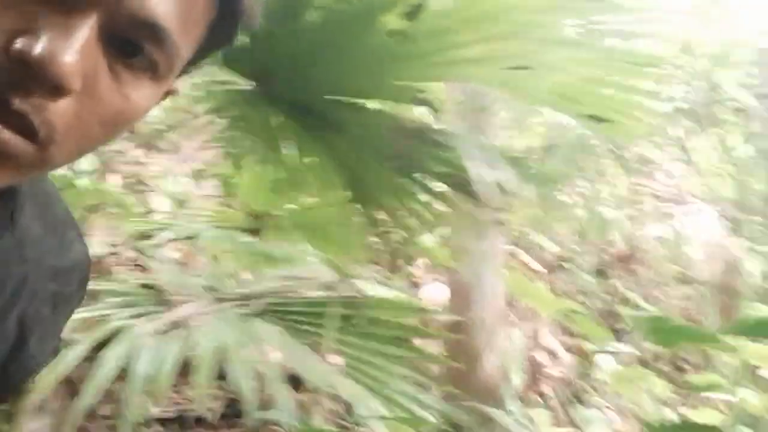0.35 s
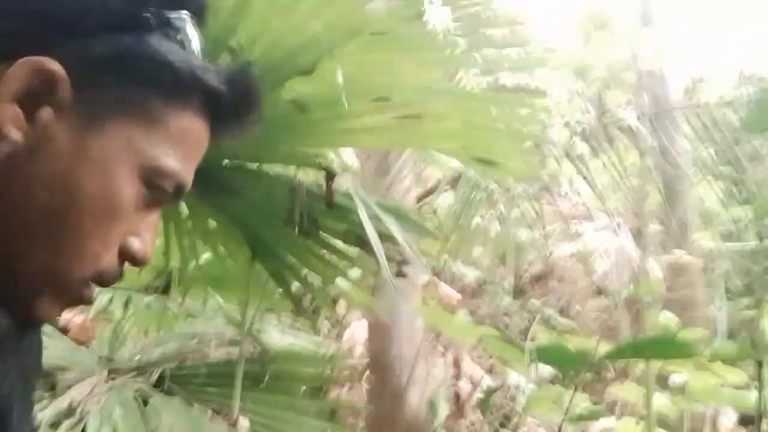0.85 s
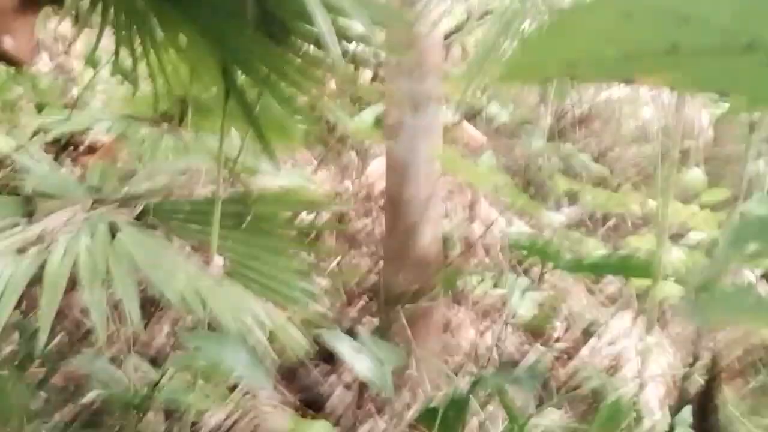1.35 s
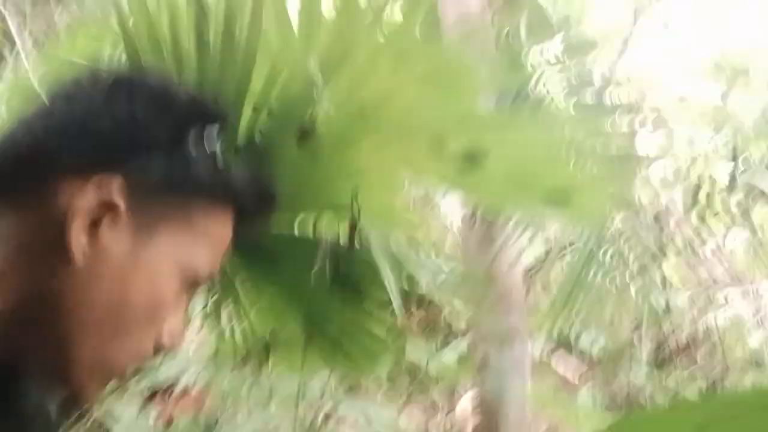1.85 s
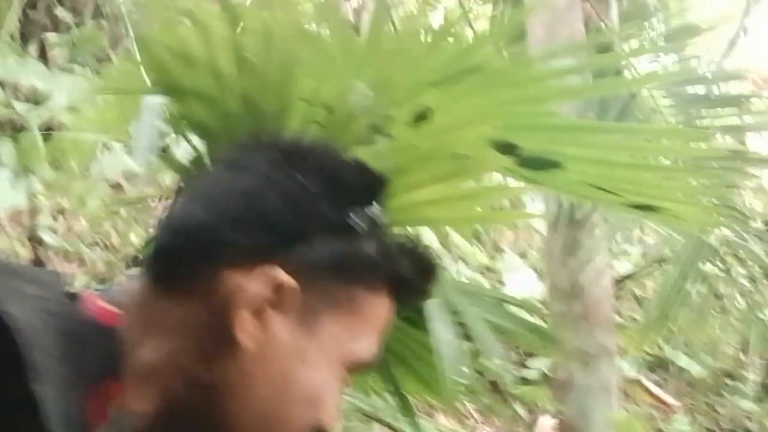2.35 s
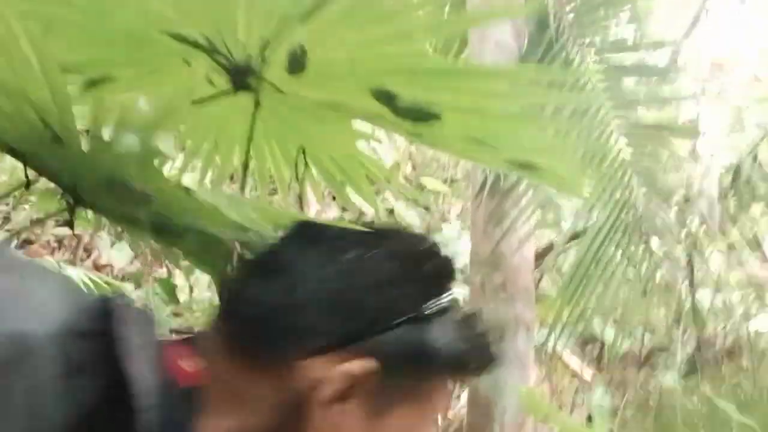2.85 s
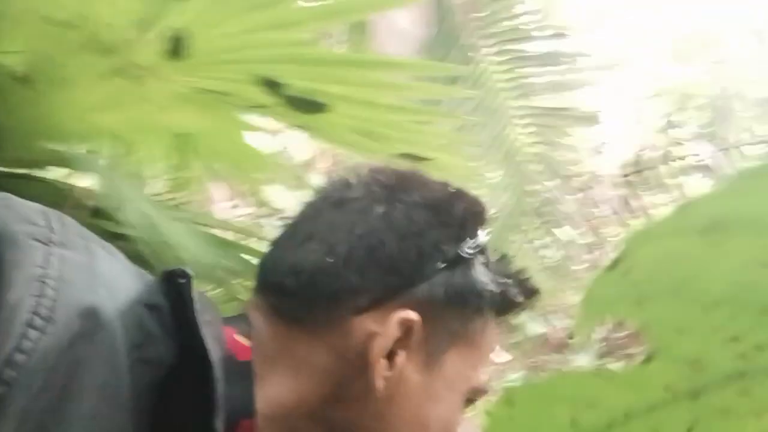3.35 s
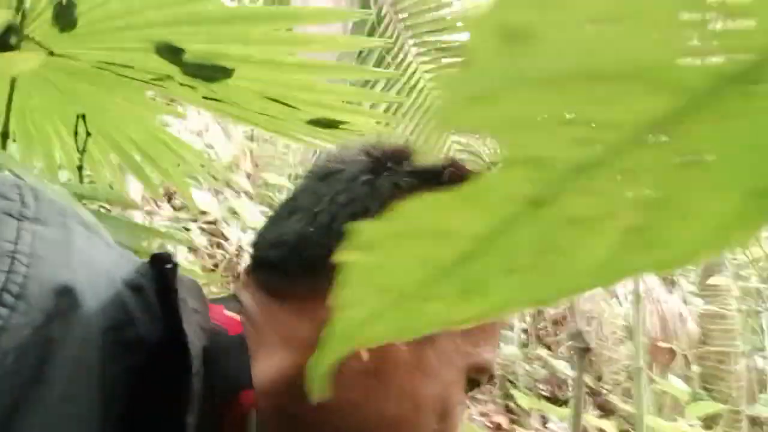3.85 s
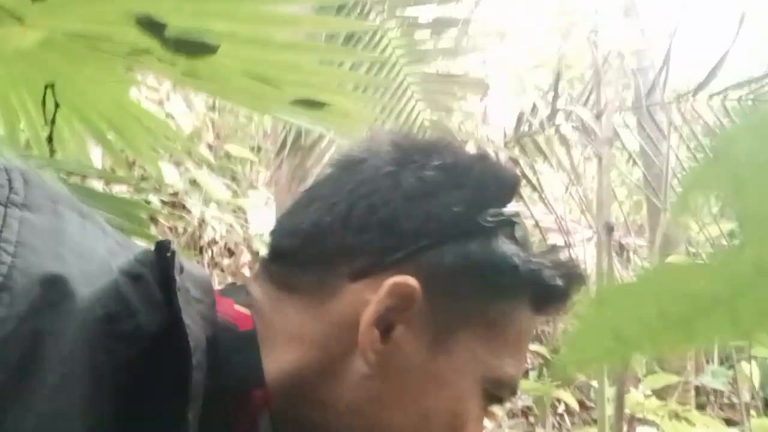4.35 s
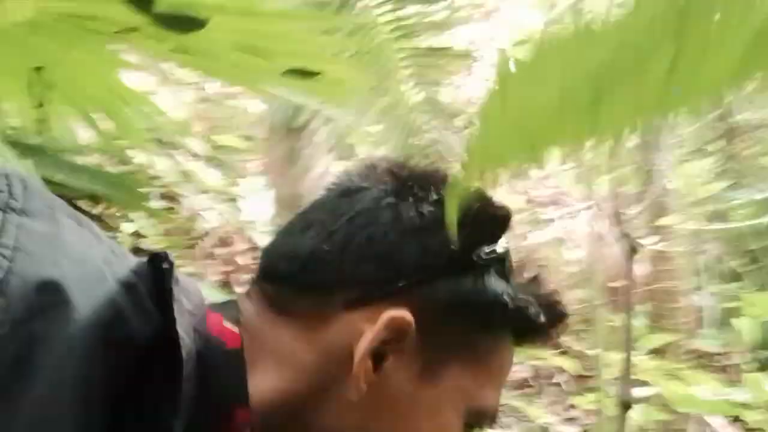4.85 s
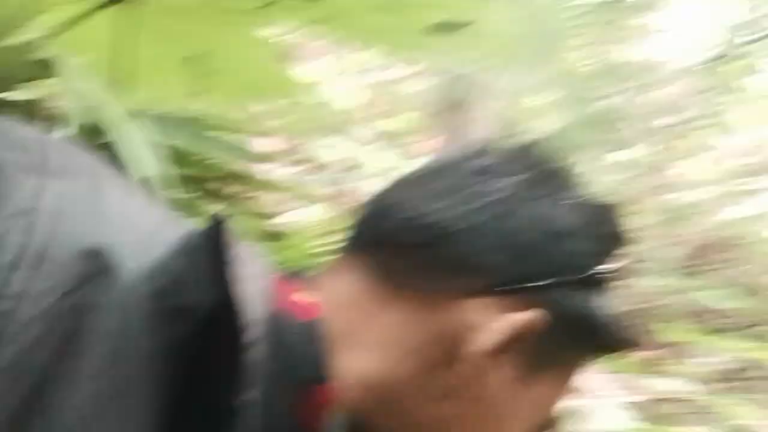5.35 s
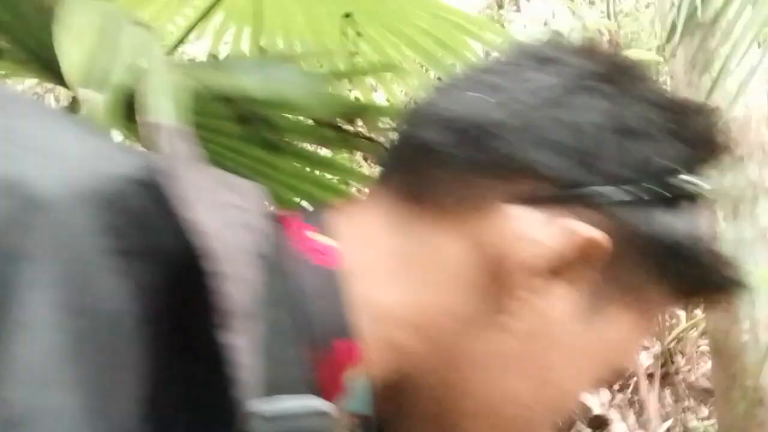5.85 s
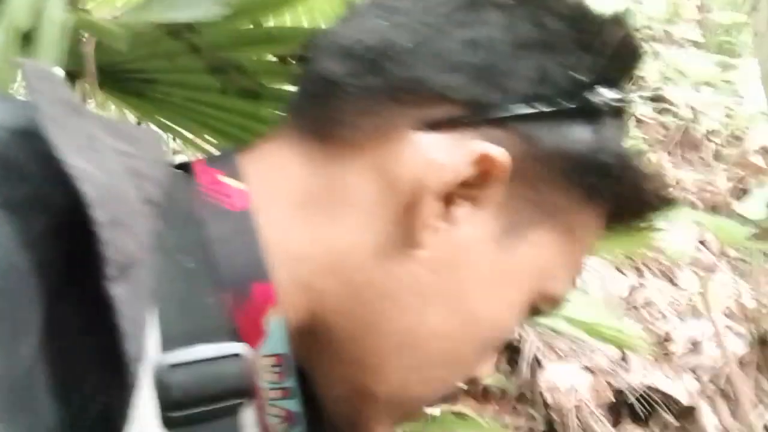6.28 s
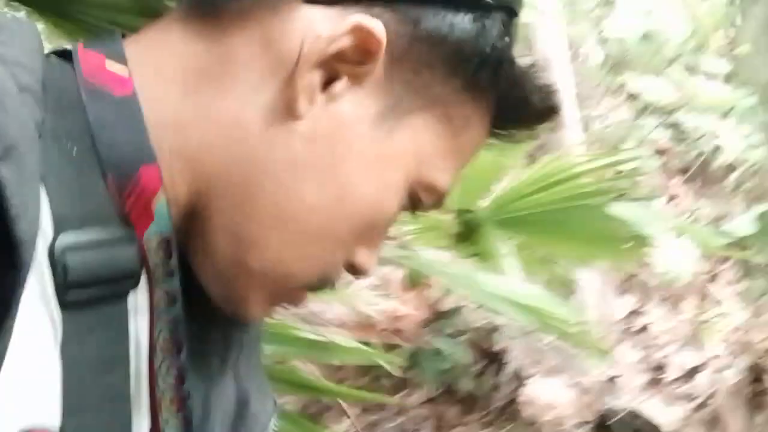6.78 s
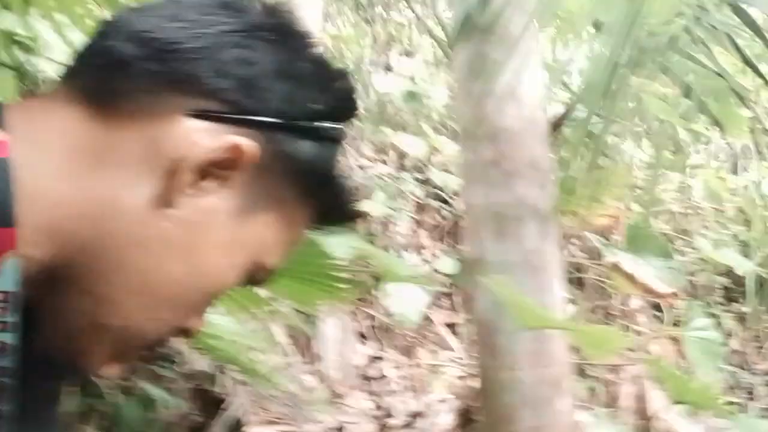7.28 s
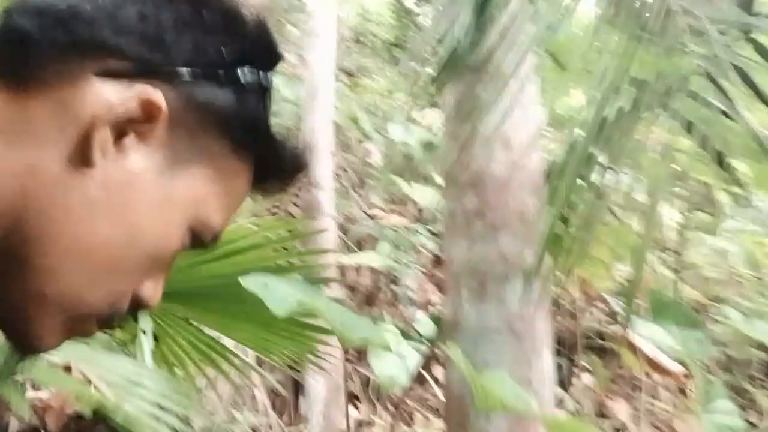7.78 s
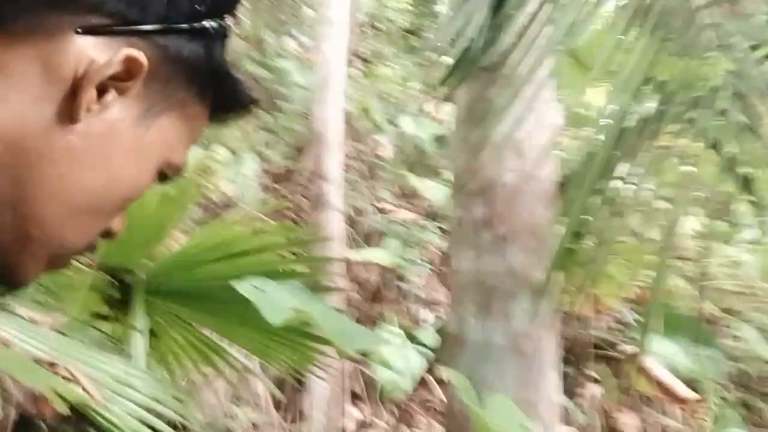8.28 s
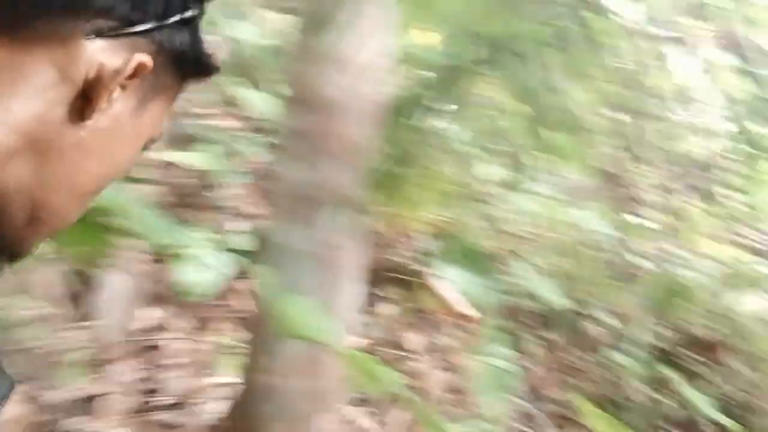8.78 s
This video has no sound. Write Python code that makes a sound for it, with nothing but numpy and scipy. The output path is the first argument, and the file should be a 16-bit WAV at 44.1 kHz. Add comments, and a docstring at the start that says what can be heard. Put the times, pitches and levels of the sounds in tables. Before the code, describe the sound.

Close to a handheld phone, someone pushes through dry forest undergrowth. Leaves tick and fronds scrape lightly, snaps grow more frequent, then a loud crunching burst breaks out before four seconds. It drops nearly quiet, with a faint falling bird whistle, before a second longer crashing rustle with hard snaps. It fades into light ticks and a small metallic clink over thin insects.

```python
"""Pushing through dry undergrowth

Someone walks through dry forest growth with a phone in hand: fronds and dead leaves rustle (patchy, coloured noise
broken up by tiny fractures), stems snap and knock (short noise bursts), and air rushes low past the swinging phone.
A steel blade clinks (decaying modes), a far bird whistles once (a gliding sine), insects sing thinly (narrow noise).
The small microphone port rings near 3.6 kHz and a noise suppressor ducks every band that is weak."""
import sys
import numpy as np
from scipy import signal
from scipy.fft import rfft, irfft
from scipy.io import wavfile
from scipy.ndimage import uniform_filter1d, map_coordinates

SR = 44100
rng = np.random.default_rng(int(sys.argv[2]) if len(sys.argv) > 2 else 0)


def transcribe(u):
    """Save the signal u as a 16-bit wav file named by the first command-line argument.

    u: samples, shape (n,) or (channels, n), limited to [-1, 1]; the rate is SR.
    q: integer samples, one column per channel.
    """
    v = np.clip(np.atleast_2d(u).T, -1, 1)
    q = np.round(v * 32767).astype(np.int16)
    wavfile.write(sys.argv[1], SR, q)


def voltage_ratio(level):
    """Linear amplitude factor for a level in decibels (scalar or array-like)."""
    return 10 ** (np.asarray(level, float) / 20)


N = 392931

# Colours of leaf and stem sounds as they pass the microphone port: ticking at the port's ring, mid scraping,
# the low body of stems, and the topmost fizz. Each row: frequency in Hz, relative level in dB per Hz.
CRACKLE_COLOUR = [(1800, -41.5), (2600, -15), (3000, -6.5), (3300, -1), (3600, 3), (3950, -1.5),
                  (4300, -11), (4900, -16.5), (5500, -18.5), (7000, -60.5)]
SCRAPE_COLOUR = [(600, -45), (900, -5), (1500, -3), (2200, 1), (2700, 0), (3600, -46)]
BODY_COLOUR = [(25, -52), (70, -63), (110, -31), (165, -51), (220, -15), (310, -5), (550, 0), (900, -3),
               (1400, -22.5)]
FIZZ_COLOUR = [(4200, -38), (5700, -2.5), (7500, -2.5), (10500, -5), (11800, -9), (13800, 2), (15200, 2.5),
               (16000, -19.5)]
# Single fronds sweeping past the microphone. Each row: time of the peak in seconds, effort in dB, length in seconds,
# extra effort in dB for fizz and sheen, extra effort in dB for scrape.
FROND_SWEEPS = [(0.846, -43.5, 0.15, -1, -3), (1.19, -44.5, 0.27, 0, 0.5), (1.447, -41, 0.13, -4, 1.5),
                (1.612, -39, 0.095, 0.5, 0.5), (1.722, -42, 0.06, 2.5, 1), (1.824, -38, 0.16, -3, -1.5),
                (2.035, -41, 0.19, -5, 0.5), (2.197, -48, 0.13, -7, 6), (2.327, -39, 0.24, -0.5, -3),
                (2.688, -40.5, 0.2, 2, -1), (2.88, -42.5, 0.14, 0, -7), (3.135, -41.5, 0.4, 3, 1.5),
                (3.427, -39, 0.11, 5, 1), (3.692, -23.5, 0.074, -2.5, -2), (3.803, -28, 0.11, 7, -4),
                (3.953, -41.5, 0.048, 6, 1.5), (4.253, -51.5, 0.14, -7, -8), (4.97, -51.5, 0.13, 2.5, 3),
                (5.536, -52, 0.045, 13, 7), (5.742, -50.5, 0.048, 15, -9), (6.138, -32.5, 0.18, -7, -4),
                (6.57, -34.5, 0.032, -10, 3), (6.778, -30.5, 0.15, 3.5, -0.5),
                (6.928, -32.5, 0.096, 8.5, -6), (7.057, -35, 0.38, 6, 0.5), (7.176, -36.5, .15, 0, -14),
                (7.36, -51.5, 0.24, 4, -1.5), (8.133, -45.5, 0.072, -1, 3), (8.285, -47, 0.06, 3, 0),
                (8.473, -46.5, 0.072, 0, -2), (8.557, -47, 0.17, 8, -3), (8.711, -48, 0.13, 5.5, 1),
                (8.806, -44.5, 0.11, 4, -9)]


def unit(x):
    """Scale to rms 1."""
    return x / np.sqrt(np.mean(x ** 2) + 1e-20)


def along(points, hz):
    """Read (Hz, value) points at hz, on a log frequency axis."""
    point_hz, values = np.transpose(points)
    return np.interp(np.log(hz + 1), np.log(point_hz + 1), values)


def curves(rows):
    """One value per sample for each column after the time."""
    seconds, *columns = np.transpose(rows)
    return [np.interp(np.arange(N) / SR, seconds, column) for column in columns]


def wobble(rate):
    """A smooth random curve with rate knots a second."""
    return map_coordinates(rng.standard_normal(N // 100), [np.arange(N) * rate / SR])


def response(spectrum, size=4096):
    """Causal (minimum-phase) impulse response with the given colour, by folding its cepstrum."""
    gain = voltage_ratio(along(spectrum, np.fft.rfftfreq(size, 1 / SR)))
    cepstrum = irfft(np.log(gain + 1e-5))
    cepstrum[1:size // 2] *= 2
    cepstrum[size // 2 + 1:] = 0
    return irfft(np.exp(rfft(cepstrum)))[:size // 2]


def coloured(x, spectrum):
    """x through a causal colour, scaled to rms 1."""
    return unit(signal.fftconvolve(x, response(spectrum))[:len(x)])


def patchy(x, patchy_db):
    """Random gain patches in time and frequency, patchy_db rms: each leaf has its own colour."""
    z = signal.stft(x, nperseg=512)[2]
    field = uniform_filter1d(rng.standard_normal(z.shape), size=3, axis=0)
    field = uniform_filter1d(field, size=24, axis=1)
    return signal.istft(z * voltage_ratio(patchy_db * unit(field)), nperseg=512)[1][:N]


def fractures(rate, spread_db, life):
    """Tiny leaf fractures, rate a second at random moments, some bigger, each dying over life seconds."""
    when, size = rng.random((2, N))
    starts = (when < rate / SR) * voltage_ratio(-spread_db * np.log(size + 0.04))
    decay = np.exp(-np.arange(2000) / (life * SR))
    return unit(signal.fftconvolve(starts, decay)[:N])


def effort(extra_db=0):
    """Effort in dB: the steady contact plus every sweep, which swells to its peak and dies away."""
    # steady contact with the leaves while moving. Each row: time in seconds, effort in dB
    contact = [(0, -57.5), (0.3, -54), (0.66, -60.5), (0.84, -48.5), (1.33, -56.5), (1.6, -47),
               (2.5, -51.5), (3.5, -47), (3.66, -42), (3.86, -32.5), (4.05, -57), (4.46, -71),
               (4.64, -55.5), (5.06, -58), (5.25, -62), (5.62, -51.5), (5.72, -39.5), (6.45, -41),
               (6.51, -39.5), (6.6, -37.5), (7.06, -33), (7.5, -43.5), (7.62, -43), (8.03, -59), (8.4, -59),
               (8.91, -54)]
    rise_share, edge_db = 0.54, 8  # share of a sweep spent rising; its ends lie this far under its peak
    t = np.arange(N) / SR
    power = voltage_ratio(2 * curves(contact)[0])
    extras_db = extra_db + np.zeros(len(FROND_SWEEPS))
    for (s, db, length), more_db in zip(np.array(FROND_SWEEPS)[:, :3], extras_db):
        near = slice(max(0, round((s - 3 * length) * SR)), round((s + 3 * length) * SR))
        before = (s - t[near]) / rise_share
        after = (t[near] - s) / (1 - rise_share)
        away = np.maximum(before, after) / length
        power[near] += voltage_ratio(2 * (db + more_db - edge_db * away))
    return 10 * np.log10(power)


def layer_levels():
    """Each colour follows the effort by its own law; some fronds fizz or scrape more than others."""
    # crackle, scrape, body, fizz, sheen. Each row: level in dB at a middling effort, rise in dB per dB of effort
    laws = [(-44.5, 0.8853), (-54, 0.97), (-58.5, 0.5973), (-56.5, 0.8234), (-62, 1.212)]
    middling_db = -45
    *_, fizz_db, scrape_db = np.transpose(FROND_SWEEPS)
    extras = (0, scrape_db, 0, fizz_db, fizz_db)
    return [db + slope * (effort(extra_db) - middling_db) for (db, slope), extra_db in zip(laws, extras)]


def rustle():
    """The same fractures and clumps drive five colours, each over its own sliding hiss."""
    # hard brushing of stiff fronds. Each row: frequency in Hz, relative level in dB per Hz
    sheen = [(3700, -32), (4300, 2.5), (4900, 0), (5300, -7), (5800, -32)]
    clumps_db = 1.03 * wobble(35)
    breaks = fractures(rate=260, spread_db=3.0, life=0.0015)
    levels = layer_levels()
    # slow brushing hisses less, so single ticks stand out
    gentle = 2 + np.clip((-48.5 - levels[0]) / 5, 0, 3.2)
    colours = (CRACKLE_COLOUR, SCRAPE_COLOUR, BODY_COLOUR, FIZZ_COLOUR, sheen)
    grains = (0.24, 0.37, 0.24, 0.23, 0.45)  # weight of the fractures against the hiss
    patches_db = (1.7, 2.5, 0.64, 2.3, 1.2)
    out = 0
    for db, colour, grain, patchy_db in zip(levels, colours, grains, patches_db):
        share = grain * gentle
        evened = np.sqrt(1 + 2 * share * breaks.mean() + share ** 2)  # more grain adds no loudness
        strength = (1 + share * breaks) / evened
        hiss = patchy(strength * rng.standard_normal(N), patchy_db)
        out = out + voltage_ratio(db + clumps_db) * coloured(hiss, colour)
    return out


def shaded(x):
    """Each shade is a smooth gain patch in time and pitch; the port's ring leans towards its present centre."""
    # the rustle turns hollow or fuller round one pitch for a while. Each row: middle of the patch in seconds,
    # length in seconds, pitch in Hz, gain in dB
    shades = [(1.786, 0.23, 1185, 6), (2.2, .16, 1330, -6), (7.552, 0.38, 725, 5)]
    # the port's ring drifts, likely as the grip shifts. Each row: time in seconds, centre in Hz
    port_drift = [(0, 3480), (0.4, 3700), (0.77, 3565), (1.29, 3670), (1.71, 3600), (2.28, 3695),
                  (2.5, 3625), (4.66, 3590), (5.5, 3744), (6.19, 3553), (7.11, 3704), (8.28, 3504),
                  (8.6, 3680)]
    shade_octaves, port_hz, port_reach_hz = 0.39, 3600, 700
    hz, t, z = signal.stft(x, SR, nperseg=512)
    db = 0
    for s, length, mid_hz, gain_db in shades:
        octaves = np.log2((hz[:, None] + 1) / mid_hz)
        db = db + gain_db * np.exp(-(octaves / shade_octaves) ** 2 - (2 * (t - s) / length) ** 4 / 4)
    away = (hz[:, None] - port_hz) / port_reach_hz
    drift_hz = np.interp(t, *np.transpose(port_drift)) - port_hz
    db = db + 0.06 * drift_hz * away * np.exp(-away ** 2)  # one side of the ring up, the other down
    return signal.istft(z * voltage_ratio(db), SR, nperseg=512)[1][:N]


def swing():
    """A dull rush in soft lumps, likely air past the port as the phone swings: low coloured noise."""
    # Each row: time in seconds, level in dB
    rush_levels = [(0, -55.5), (0.3, -70.5), (0.66, -67), (0.83, -63), (1.3, -60), (1.8, -55.5), (2.1, -62),
                   (2.85, -59.5), (3.45, -61.5), (3.62, -50.5), (4.0, -62.5), (4.25, -59), (4.46, -76),
                   (4.75, -66), (5.0, -60.5), (5.3, -63.5), (5.5, -69.5), (6.0, -60.5), (6.4, -62),
                   (6.95, -53.5), (7.6, -61), (8.0, -61), (8.3, -59.5), (8.55, -59.5), (8.75, -76),
                   (8.91, -87.5)]
    # Each row: frequency in Hz, relative level in dB per Hz
    rush_colour = [(120, -37.5), (170, -25.5), (220, -7.5), (310, 1), (420, -2), (600, -12.5), (1000, -24)]
    lumps_db = 1.95 * wobble(30)
    return voltage_ratio(curves(rush_levels)[0] + lumps_db) * coloured(rng.standard_normal(N), rush_colour)


def forest():
    """A smooth hush of coloured noise with a narrow insect band."""
    # the hush of the place. Each row: frequency in Hz, relative level in dB per Hz
    air = [(25, -30), (100, -5.5), (160, -16.5), (290, -1.5), (600, -20.5), (1300, -7), (2600, -13),
           (3600, -12), (4500, -5), (6300, -15.5), (11600, -12), (14400, -3), (16000, -5.5)]
    # the insects. Each row: time in seconds, level in dB
    insect_levels = [(0, -74), (5.3, -72.5), (8.91, -81)]
    insect_colour = [(6700, -54.0), (7100, -3), (7600, 4), (7800, -30), (8100, -72)]  # Hz, dB per Hz
    chorus = coloured(rng.standard_normal(N), insect_colour)
    hush = voltage_ratio(-55.5) * coloured(rng.standard_normal(N), air)
    return hush + voltage_ratio(curves(insect_levels)[0] + 0.56 * wobble(20)) * chorus


def snaps():
    """A snap is a sharp crack with a short ragged tail; its knock lasts longer than the crack."""
    # the clearest snaps of stems and leaves. Each row: start in seconds, crack peak in dB,
    # low knock and scrape in dB relative to that peak, fizz in dB relative to that peak
    snap_rows = [(0.071, -36, -30, -8), (0.0758, -41, -20, -6), (0.0905, -39, -30, -13),
                 (0.0948, -38.5, -30, -13), (0.0988, -35, -30, -13), (0.2191, -36.5, -2.5, 9),
                 (0.709, -37.5, -33, -6), (1.027, -32.5, -14, -14), (1.1041, -28.5, -15, -10),
                 (1.167, -28, -19, -8), (1.371, -30, -27, -15), (1.391, -29, -13, -15),
                 (1.4194, -29.5, -27, -5), (1.6965, -27, -12, -19), (1.704, -27, -10.5, -19),
                 (1.832, -31.5, -8, -15), (1.9812, -27, -22, -14), (2.0157, -24.5, -7, -21),
                 (2.2179, -32.5, -8, -13), (2.4117, -27, -42, -11), (2.5713, -21.5, -17.5, -7),
                 (2.6223, -29, -24, -5), (2.6465, -31, -12, -22), (2.81, -29, -6, -15),
                 (2.8914, -25.5, -32, -19), (3.0473, -27, -13, -10), (3.1195, -20.5, -43, -11),
                 (3.1634, -23, -15, -6.5), (3.3834, -24, -13, -1), (3.566, -27, -16, -10),
                 (3.5842, -22, -32, 1.5), (3.61, -19.5, -15.5, -10), (3.6194, -22, -27, -5.5),
                 (3.6775, -11.5, -22, -26), (3.6907, -21, -16, -2), (3.7062, -18.5, -19, -6),
                 (3.7474, -16.5, -22, -4), (3.7865, -18, -35, -18), (3.8213, -13.5, -17, -8),
                 (3.8244, -13, -26, -14), (3.8332, -14, -36, -5), (3.8506, -16.5, -14, -1.5),
                 (3.8805, -17.5, -19.5, -5), (3.8865, -24, -33, 4.5), (4.0308, -30.5, -15, -11),
                 (4.255, -33.5, -9, -8), (4.551, -38, -32, -7), (4.708, -33, -28, 0),
                 (4.7133, -32.5, -33, 3), (4.752, -46, -7, -6), (4.9727, -42, -20, -15),
                 (4.9872, -43, -20, -8), (5.0178, -34.5, -15, 1), (5.3883, -32, -25, -6),
                 (5.5296, -34.5, -10, 2), (5.728, -38, -28, -13), (5.8257, -21.5, -34, -21),
                 (5.962, -28, -11, -1), (6.076, -25, -31, 3), (6.111, -19, -19.5, -13),
                 (6.1649, -14.5, -46, -16), (6.5615, -13, -22, -12.5), (6.7943, -23, -8, -9),
                 (6.804, -13, -12.5, -7), (6.921, -16, -31, -18), (6.9649, -20, -18, -15),
                 (6.992, -17.5, -11.5, -8.5), (7.0376, -16, -16, -24), (7.262, -17, -21, -11.5),
                 (7.608, -36, -14, -10), (7.641, -34, -15, -14), (7.759, -28, -36, -11),
                 (8.097, -39.5, -0.5, -14), (8.1986, -31, -8, -3)]
    out, t = np.zeros(N + SR), np.arange(SR // 14) / SR
    for s, db, knock_db, fizz_db in snap_rows:
        crack, knock, scrape = rng.standard_normal((3, len(t)))
        # the very loudest snaps have shorter tails and scrapes
        age = t / np.clip(1.5 - 0.3 * (db + 15), 0.34, 1)
        crack = crack * (voltage_ratio(-60 * t / 0.0024) + 0.32 * voltage_ratio(-60 * age / 0.054))
        scrape = scrape * voltage_ratio(-60 * age / 0.041)
        knock = knock * voltage_ratio(-60 * t / 0.019)
        parts = [(crack, CRACKLE_COLOUR, 0), (crack, FIZZ_COLOUR, fizz_db),
                 (scrape, SCRAPE_COLOUR, knock_db), (knock, BODY_COLOUR, knock_db)]
        for drive, colour, rel_db in parts:
            wave = coloured(drive, colour)
            out[round(s * SR):][:len(t)] += voltage_ratio(db + rel_db) * wave / np.abs(wave).max()
    return out[:N]


def thumps():
    """A soft low push that rings for a few cycles: a decaying sine with a rounded start."""
    # dull knocks of a stem or the hand on the phone case. Each row: start in seconds, peak in dB, pitch in Hz
    knocks = [(0.218, -42, 278), (1.24, -42, 476), (1.453, -51, 288), (2.298, -52, 303), (7.267, -47, 299),
              (7.608, -51, 317), (7.935, -45, 378)]
    fade_cycles = 2  # cycles to fade by 20 dB
    out, t = np.zeros(N + SR), np.arange(SR // 10) / SR
    for s, db, hz in knocks:
        ring = np.sin(2 * np.pi * hz * t) * voltage_ratio(-20 * hz * t / fade_cycles)
        ring = ring * (1 - np.exp(-t / 0.0023))
        out[round(s * SR):][:len(t)] += voltage_ratio(db) * ring / np.abs(ring).max()
    return out[:N]


def blade():
    """Steel touched by a stem rings its modes; the lowest is a beating pair, soft touches ring duller."""
    # modes of the steel. Each row: frequency in Hz, relative level in dB, time to fade by 60 dB in seconds
    modes = [(1516, 0, 0.19), (1525, -15, 0.9), (2428, 0, .1), (3180, 3, 0.045), (4850, 4, 0.04),
             (5800, 1, 0.03)]
    # stems touching the blade. Each row: start in seconds, level in dB, brightness in dB per octave
    clinks = [(4.03, -58, -8), (4.18, -58, -12), (8.197, -44, 2), (8.283, -53, -5)]
    out, t = np.zeros(N + SR), np.arange(SR // 2) / SR
    for s, db, tilt_db in clinks:
        ring = 0
        for hz, level, t60 in modes:
            mode_db = level + tilt_db * np.log2(hz / modes[0][0]) + rng.normal(0, 1.3)
            ring = ring + voltage_ratio(mode_db - 60 * t / t60) * np.sin(2 * np.pi * hz * t)
        out[round(s * SR):][:len(t)] += voltage_ratio(db) * ring * (1 - np.exp(-t / 0.00014))
    return out[:N]


def bird():
    """One thin falling whistle, a gliding sine wavering with distance."""
    # Each row: time in seconds, pitch in Hz, rms level in dB
    whistle = [(5.04, 2500, -68), (5.12, 2350, -65), (5.2, 2290, -66), (5.31, 2240, -75)]
    hz, db = curves(whistle)
    t = np.arange(N) / SR
    gate = np.clip(np.minimum(t - whistle[0][0], whistle[-1][0] - t) / 0.023, 0, 1)
    tone = np.sqrt(2) * np.sin(2 * np.pi * np.cumsum(hz) / SR)
    return gate * voltage_ratio(db + 2.2 * wobble(65)) * tone


def scene():
    """Everything reaches one microphone; leaves and stems hold no deep bass."""
    low_cut = signal.butter(3, 150, "high", fs=SR, output="sos")  # Hz
    leaves = signal.sosfilt(low_cut, shaded(rustle()) + snaps())
    return (leaves + thumps() + swing() + blade() + bird() + forest())[None]


def suppressor(x):
    """Bands whose smoothed power lies under the threshold are turned down, gradually about the knee."""
    # Each row: frequency in Hz, threshold in dB per band
    threshold = [(200, -70.5), (5200, -59.5), (6000, -56.5), (12000, -52)]
    # Each row: frequency in Hz, most dB taken off weak bands
    depth = [(500, 9), (1100, 9)]
    knee_db, memory = 2.4, .87  # memory: share of the running average kept from frame to frame
    hz, _, z = signal.stft(x, SR, nperseg=512)
    power = uniform_filter1d(np.abs(z) ** 2, size=3, axis=1)
    power = signal.lfilter([1 - memory], [1, -memory], power, axis=2)
    power = uniform_filter1d(power, size=9, axis=2)
    over_db = 10 * np.log10(np.abs(power) + 1e-20) - along(threshold, hz)[:, None]
    duck = (1 - np.tanh(over_db / knee_db)) / 2
    gain = voltage_ratio(-along(depth, hz)[:, None] * duck)
    return signal.istft(z * gain, SR, nperseg=512)[1][:, :N]


def top_cut(x):
    """Nothing passes above the cut-off."""
    return signal.sosfilt(signal.butter(12, 15880, fs=SR, output="sos"), x)


def record(dry):
    """The phone suppresses noise; its converter adds a small constant offset."""
    mix = suppressor(dry) - 2e-4
    return top_cut(mix)


dry = scene()
out = record(dry)
transcribe(out)
```